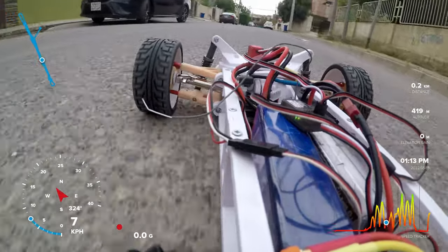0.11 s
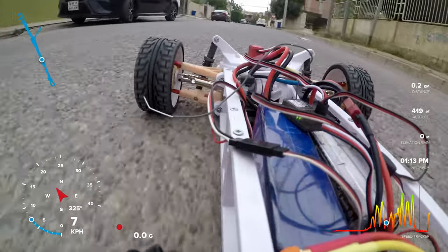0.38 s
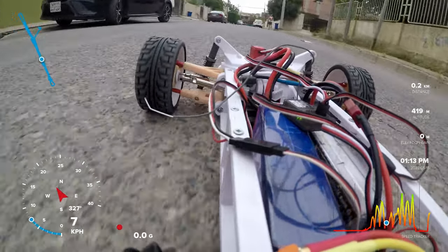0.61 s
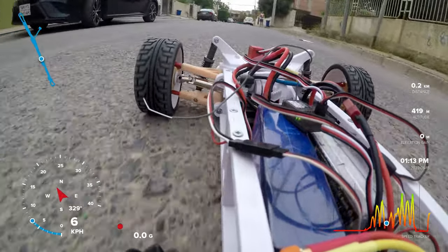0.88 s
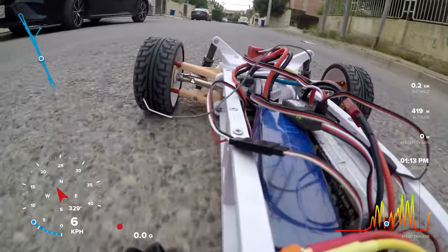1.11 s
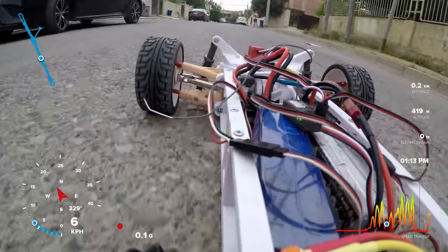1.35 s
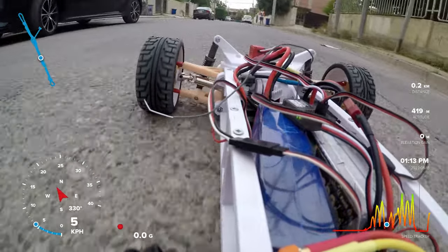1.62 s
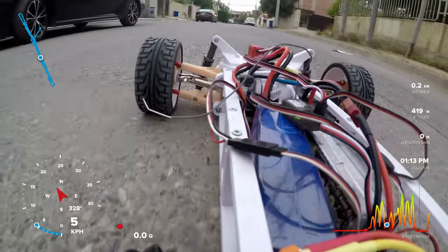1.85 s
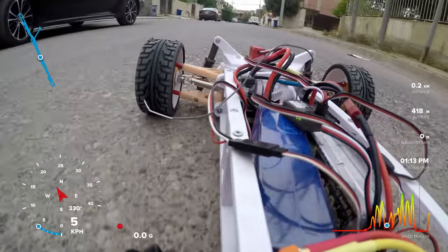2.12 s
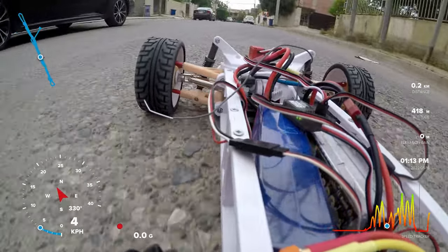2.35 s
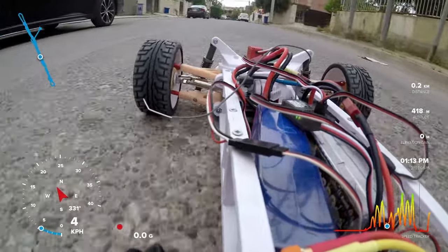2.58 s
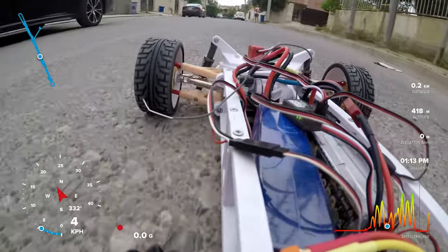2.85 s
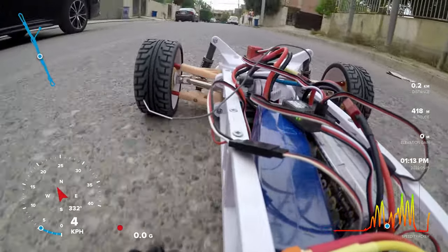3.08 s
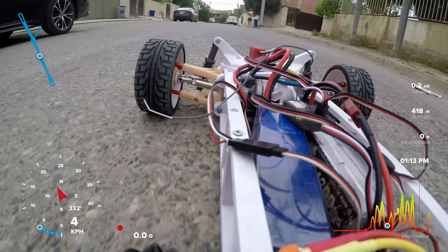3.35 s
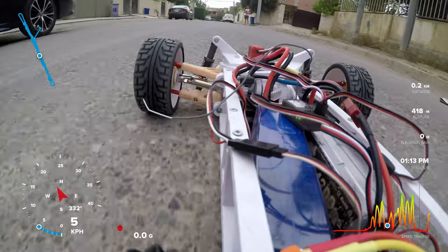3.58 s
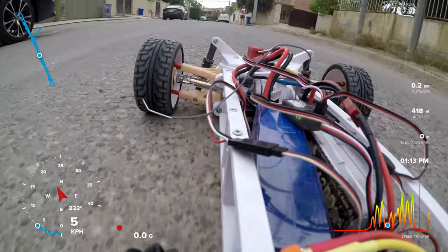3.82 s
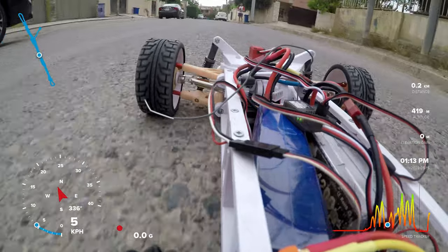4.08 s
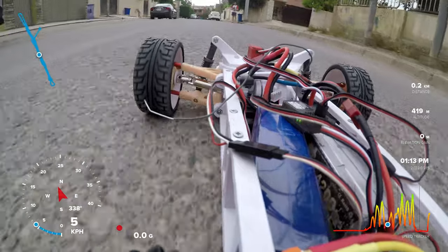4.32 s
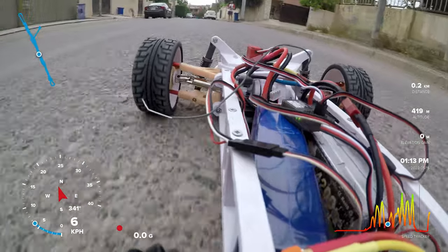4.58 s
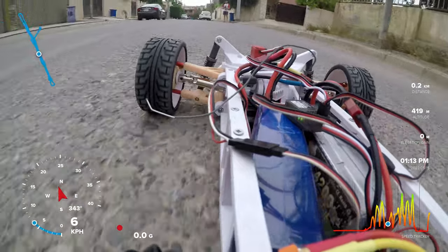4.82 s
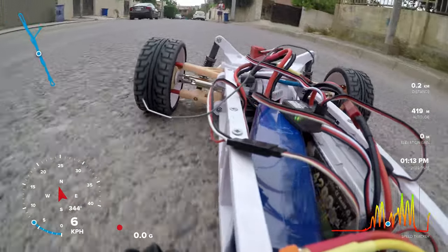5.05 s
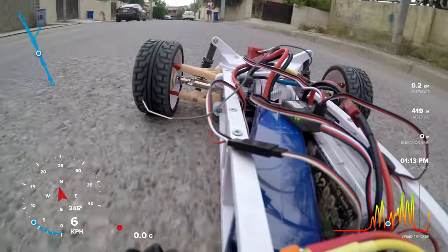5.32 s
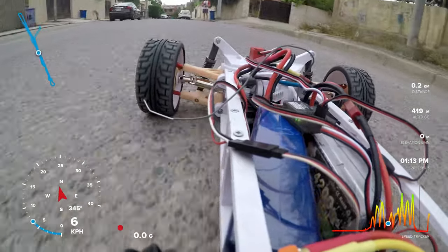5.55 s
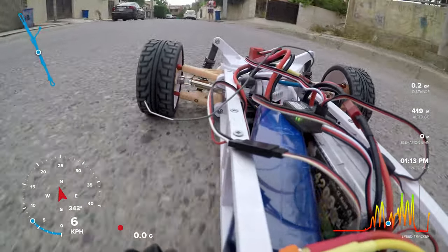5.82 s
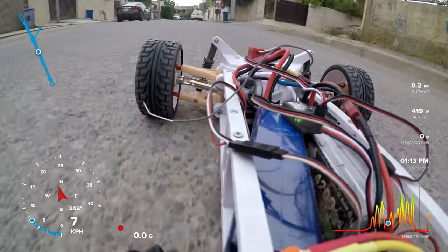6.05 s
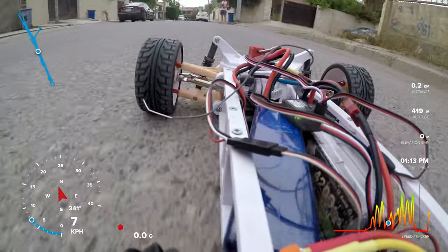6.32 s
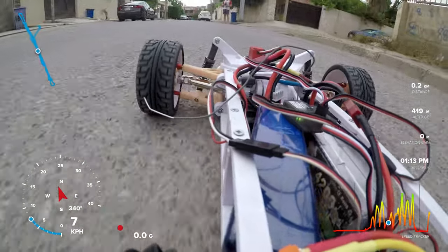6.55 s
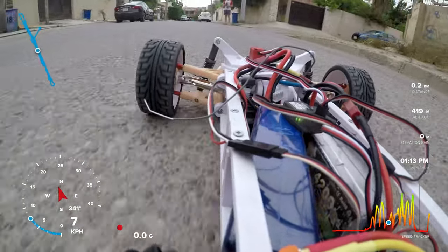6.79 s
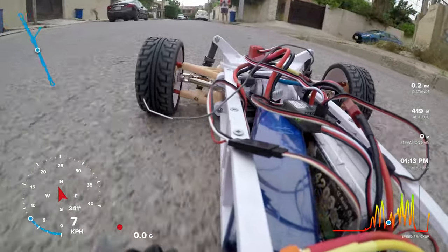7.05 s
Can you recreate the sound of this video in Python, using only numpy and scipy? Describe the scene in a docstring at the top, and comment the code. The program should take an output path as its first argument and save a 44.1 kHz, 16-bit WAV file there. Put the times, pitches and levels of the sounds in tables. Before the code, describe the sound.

A small electric car's tyres drum and rattle over coarse asphalt, its throbbing hum sagging in pitch, then whining and climbing back up.

```python
"""Tread blocks of a small electric car drum on coarse asphalt; the speed falls, then climbs.
A camera bolted to the metal frame hears it: tread and drive gear are waves locked to the wheel turn,
rung through the frame. Filtered noise makes the road bumps, and random knocks and noise make the grit.
Larger stones set loose parts clattering, and the speed controller whistles faintly as a wavering tone.
The camera cuts the bass and its limiter holds the peaks."""
import sys
import numpy as np
from scipy import signal
from scipy.fft import rfft, irfft, next_fast_len
from scipy.io import wavfile
from scipy.ndimage import uniform_filter1d, minimum_filter1d

SR = 44100
rng = np.random.default_rng(int(sys.argv[2]) if len(sys.argv) > 2 else 0)


def dump_mix(stems):
    """Bounce the given channels to the path in sys.argv[1] as a 16-bit WAV at rate SR."""
    frames = np.atleast_2d(stems).T  # one column per channel
    limited = np.clip(frames, -1, 1)  # hard clip at full scale
    pcm = np.round(limited * 32767).astype(np.int16)
    wavfile.write(sys.argv[1], SR, pcm)


def field_ratio(decibels):
    """Amplitude ratio for a level in dB (20 dB per decade); scalars and array-likes work."""
    return 10 ** (np.asarray(decibels, dtype=float) / 20)


N = 316197
T = np.arange(N) / SR  # time in seconds
TEETH = 27  # gear meshes in one wheel turn
QUICK_TURN = 0.42  # where in the turn the pitch is highest, counted from the lightest load

# Ringing tones of the metal frame. Each row: frequency in Hz, width in Hz, level in dB.
FRAME_MODES = [(164, 35.5, 2), (214, 22, 10.5), (295.6, 27.3, 5), (367.8, 51, 5), (488.5, 40.7, 5),
               (594, 43.5, -1), (741, 56, 1), (964.3, 42, -2), (1250, 130, -18)]


def evened(x):
    """Scales a sound to an average (rms) strength of 1."""
    return x / np.sqrt(np.mean(x ** 2) + 1e-20)


def columns(rows):
    """Draws straight lines between the rows of a table, giving each column sample by sample."""
    seconds, *values = np.transpose(rows)
    return [np.interp(T, seconds, value) for value in values]


def wander(hz):
    """Smooth random drift of rms 1 that changes about hz times a second."""
    lowpass = signal.butter(2, hz, fs=SR, output="sos")
    # the first second is thrown away while the filter settles
    return evened(signal.sosfilt(lowpass, rng.standard_normal(N + SR))[SR:])


def shaped(x, points):
    """Colours a sound by a curve of (Hz, dB) points."""
    size = next_fast_len(N)
    hz, db = np.transpose(points)
    f = np.fft.rfftfreq(size, 1 / SR)
    gain = field_ratio(np.interp(np.log(f + 1), np.log(hz + 1), db))
    return irfft(rfft(x, size) * gain, size)[:N]


def ring(x, modes):
    """Makes a body ring: each mode is a damped resonance, and their signs alternate."""
    size = next_fast_len(N + SR)
    f = np.fft.rfftfreq(size, 1 / SR)
    body = 0
    for k, (hz, width, db) in enumerate(modes):
        resonance = 1j * f * width / (hz ** 2 - f ** 2 + 1j * f * width)
        body = body + (-1) ** k * field_ratio(db) * resonance
    return irfft(rfft(x, size) * body, size)[:N]


def tread(turns):
    """Each tyre lands its unequal blocks in turn while it slips and hops; the load swells once a turn."""
    # Rows of tread on the four tyres. Each row: blocks landing in one wheel turn, level in dB.
    tyre_rows = [(26, -9), (27, -10), (28, 0), (30, -12)]
    # Tread hum, strong while the car runs free and weak while the motor pulls.
    # Each row: time in seconds, hum level in dB, depth of the once-a-turn throb from 0 to 1.
    hum_rows = [(0, -17.5, .35), (.79, -18, .25), (.84, -26, .3), (1.13, -25, .3), (1.22, -30, .5),
                (1.47, -25, .6), (1.55, -30, .6), (1.68, -26, .6), (1.85, -31, .4), (2.3, -29, .45),
                (2.9, -30, .45), (3.9, -31, .45), (4.4, -31.5, .45), (5.1, -30, .45), (5.6, -29, .45),
                (5.95, -19, .75), (6.3, -16.5, .85), (7.17, -16, .8)]
    # Slap of the block edges. Each row: time in seconds, level in dB.
    slap_rows = [(0, -20.5), (.8, -23.5), (1.1, -34.5), (1.35, -26), (1.62, -24), (1.8, -33), (2.15, -31),
                 (2.35, -24), (2.5, -22.5), (2.66, -22.5), (2.85, -29.5), (3.9, -27.5), (4.6, -23),
                 (5.3, -28.5), (5.8, -28), (6.2, -23), (7.17, -25)]
    slip_hz, uneven_db, hop_db = 4, 1.5, 1.4  # rms size of each random change
    spacing = 0.48  # how far the blocks crowd to one side, in blocks
    flat = 0.45  # share of the twice-a-turn part in the load

    hum_db, throb = columns(hum_rows)
    [slap_db] = columns(slap_rows)
    out = np.zeros(N)
    for count, db in tyre_rows:
        # blocks sit closer on one side of the tyre, so the pitch arches once a turn
        blocks = count * turns - spacing * np.sin(2 * np.pi * (QUICK_TURN - turns))
        blocks += np.cumsum(slip_hz * wander(24.8)) / SR + rng.random()
        # uneven wear comes round again every turn
        wear = np.interp(turns, np.arange(TEETH) / TEETH, rng.standard_normal(TEETH), period=1)
        contact = field_ratio(db + uneven_db * wear + hop_db * wander(24))
        phase = 2 * np.pi * blocks
        edges = np.cos(2 * phase) + field_ratio(-3) * np.cos(3 * phase) + field_ratio(-12) * np.cos(4 * phase)
        out += contact * (field_ratio(hum_db) * np.cos(phase) + field_ratio(slap_db) * edges)
    # the load dips sharply once a turn and sags a little half a turn later
    dip = (np.cos(2 * np.pi * turns) + flat * np.cos(4 * np.pi * turns)) / (1 + flat)
    return (1 - np.clip(throb, 0, 1) * dip) * out / np.sqrt(len(tyre_rows))


def gear(turns, tone_db):
    """A steadier tone locked to the speed; an off-centre gear makes it warble and throb once a turn."""
    # Gear overtone: the teeth take up the load in surges.
    # Each row: time in seconds, level in dB, raggedness in radians.
    overtone_rows = [(0, -37, 0.98), (.79, -45, 0.41), (2.2, -53, 0.6), (2.3, -28, 1.1), (2.5, -30, 0.96),
                     (2.63, -24, 0.69), (2.68, -47, 1), (2.84, -41, 1.1), (2.87, -17, 0.54),
                     (2.935, -31, .4), (2.98, -22.5, .35), (3.03, -24, .35), (3.065, -31, .4),
                     (3.1, -23.5, .3), (3.32, -23.5, .3), (3.355, -32, .4), (3.39, -24.5, .4),
                     (3.54, -26, .5), (3.9, -27, .6), (4.4, -26.5, .6), (4.6, -24.5, 1.4),
                     (4.8, -26.5, 0.74), (5.2, -28, 1.2), (5.5, -27.5, 1.7), (5.7, -22.5, 0.41),
                     (5.95, -30, 0.93), (6.1, -32, 1.3), (7.17, -45, 0.84)]
    # Third partial of the mesh, which grows as the motor pulls harder.
    # Each row: time in seconds, level relative to the overtone in dB.
    third_rows = [(0, -12), (3.6, -13), (4.4, -5), (5.0, -1), (5.7, 0), (6.1, -8), (7.17, -12)]
    wobble_hz, runout = 5, 0.5  # random pitch drift (rms), once-a-turn warble in radians

    overtone_db, ragged = columns(overtone_rows)
    [third_db] = columns(third_rows)
    meshes = TEETH * turns + np.cumsum(wobble_hz * wander(13.64)) / SR
    mesh = 2 * np.pi * meshes + runout * np.sin(2 * np.pi * (turns - QUICK_TURN))
    throb = 1 - 0.084 * np.cos(2 * np.pi * turns) + 0.23 * wander(24)
    # backlash jars the mesh, which blurs the tone a little and the overtones more
    play = ragged * wander(36)
    surge = field_ratio(1.3 * wander(45))
    third = field_ratio(third_db) * np.cos(3 * mesh + 1.5 * play)
    chatter = surge * (np.cos(2 * mesh + play) + third)
    tone = field_ratio(tone_db) * np.cos(mesh + play / 2)
    return np.sqrt(2) * throb * (tone + field_ratio(overtone_db) * chatter)


def bumps(mesh_hz):
    """Random road height shakes the suspension and the frame, so noise rings through both."""
    # Suspension and tyre carcass. Each row: frequency in Hz, width in Hz, level in dB.
    spring_modes = [(28.2, 9.4, -0.5), (61, 25.6, -3.5), (79.1, 18.95, 1), (110, 40.3, -2.5),
                    (145, 31.8, -7.5)]
    # Bump rumble. Each row: time in seconds, level in dB.
    rumble_rows = [(0, -22.5), (1.3, -21.5), (2.8, -23), (3.9, -23.5), (5.1, -20.5), (6.2, -23.5),
                   (7.17, -24.5)]
    cruise_hz, cruise_db = 333, -30.5  # gear mesh rate at cruising speed, frame shake there
    db_per_octave = -9.5  # slower wheels drop deeper into the asphalt

    shake_db = cruise_db + db_per_octave * np.log2(mesh_hz / cruise_hz)
    [rumble_db] = columns(rumble_rows)
    low = evened(ring(rng.standard_normal(N), spring_modes))
    road = shaped(rng.standard_normal(N), [(150, -1.5), (1500, -6.0)])
    frame = evened(ring(road, FRAME_MODES))
    return field_ratio(rumble_db) * low + field_ratio(shake_db) * frame


def grit(turns, stone_gain):
    """Dense tiny knocks come in flurries; each loose part partly keeps its own rhythm."""
    # Loose parts and camera housing. Each row: frequency in Hz, width in Hz, level in dB.
    housing_modes = [(952, 158, -1.5), (1203, 157, -2.5), (1955, 205, -4.5), (2224, 77, -3.5),
                     (3090, 300, -23.5), (3980, 140, -17), (4415, 337, -18.5), (5270, 1180, -27.5),
                     (5900, 560, -33), (10000, 3900, -38.5)]
    # Colour of the broad rolling noise. Each row: frequency in Hz, relative level per Hz in dB.
    air_points = [(88, -28), (150, -2), (740, -7.5), (1630, -16.5), (2200, -14), (2660, -27.5), (3170, -16),
                  (5860, -53), (7360, -64), (8320, -46), (9920, -105), (12900, -135), (21800, -120)]
    # Grit rattle without the larger stones.
    # Each row: time in seconds, level in dB, extra level of the small high parts in dB.
    rattle_rows = [(0, -31.5, 1.5), (1.4, -30, 0), (1.78, -30.5, 0), (1.83, -35, -3.5), (1.88, -29.5, -3.5),
                   (1.96, -28, 0), (1.99, -37.5, 0.5), (2.03, -29.5, -0.5), (2.2, -31.5, 1),
                   (2.48, -30, 1.5), (2.53, -33, -4.5), (2.6, -32.5, 1), (2.7, -34, 1), (3.8, -33, -0.5),
                   (4.7, -31.5, 2.5), (5.6, -28.5, 0.5), (6.2, -32.5, 2), (7.17, -32, 0.5)]
    # How the wheel turn and its joints pulse the rattle. Each row: beats in one turn, depth in dB.
    beat_rows = [(1, .8), (3, .4), (4, .9)]
    small_parts_hz = 3500  # parts ringing above this count as small
    knocks_per_s, spread_db = 1100, 4

    steady_db, small_db = columns(rattle_rows)
    rattle_db = 20 * np.log10(field_ratio(steady_db) + stone_gain)
    beats_db = sum(depth_db * np.cos(2 * np.pi * (k * turns + rng.random())) for k, depth_db in beat_rows)
    jolts = field_ratio(0.6 * wander(26) + 1.7 * wander(70) + beats_db)
    rattle = np.zeros(N)
    for hz, width, db in housing_modes:
        sizes = field_ratio(spread_db * np.minimum(rng.exponential(1, N), 5))
        knocks = sizes * (rng.random(N) < knocks_per_s / SR)
        knocks = evened(knocks * rng.choice([-1., 1.], N)) + 0.78 * rng.standard_normal(N)
        own_rhythm = field_ratio(1.77 * wander(30))
        # the knocks ring before the jolts swell them, and once more afterwards
        struck = jolts * own_rhythm * ring(knocks, [(hz, 2 * width, 0)])
        rattle += field_ratio(small_db * (hz > small_parts_hz)) * ring(struck, [(hz, width, db)])
    rolling = evened(shaped(jolts ** 0.92 * rng.standard_normal(N), air_points))
    return field_ratio(rattle_db) * (field_ratio(-3.5) * evened(rattle) + field_ratio(3.0) * rolling)


def whistle():
    """The speed controller switches at a steady rate, heard as a tone that wavers slightly."""
    # Each row: time in seconds, level in dB before it wavers.
    whistle_rows = [(0, -66), (2.2, -74), (2.6, -66.5), (4, -66), (5.8, -67), (6.2, -68), (7.17, -71.5)]
    [whistle_db] = columns(whistle_rows)
    phase = 2 * np.pi * np.cumsum(8025 + 9 * wander(44)) / SR  # Hz
    return field_ratio(whistle_db + 2.6 * wander(29)) * np.sqrt(2) * np.cos(phase)


def stones():
    """Larger stones set the loose parts clattering: each quickly lifts the rattle gain, then it fades."""
    # Each row: time in seconds, level in dB before the rise and fade.
    stone_rows = [(0.26, -38.5), (.681, -32), (0.874, -26.5), (1.049, -32), (1.16, -24.5), (1.297, -29),
                  (1.529, -31), (1.573, -27.5), (1.867, -31.5), (1.909, -31.5), (1.939, -33),
                  (2.024, -35.5), (2.108, -40), (2.169, -31), (2.288, -33), (2.346, -35.5), (2.448, -34),
                  (2.605, -28.5), (2.788, -32.5), (2.854, -27), (2.732, -23), (2.942, -34.5),
                  (3.112, -31.5), (3.786, -30), (4.467, -36), (5.514, -29.5), (5.647, -38), (5.78, -30)]
    rise_s, fade_s = 0.0024, 0.005
    start_s, stone_db = np.transpose(stone_rows)
    since = np.maximum(T - start_s[:, None], 0)
    bursts = field_ratio(stone_db)[:, None] * np.minimum(since / rise_s, 1) * np.exp(-since / fade_s)
    return bursts.sum(0)


def scene():
    """The tread and gear ring through the frame, the bumps, grit and whistle join them, and one mix starts both
    channels alike."""
    # The drive gear. Each row: time in seconds, mesh rate in Hz, tone level in dB before the frame rings.
    drive_rows = [(0, 364.2, -32), (.79, 348.8, -30), (1.1, 329, -35), (1.7, 282.4, -34), (2.0, 248, -40),
                  (2.3, 224.7, -43), (2.6, 216, -42), (2.85, 220.5, -42), (3.32, 243.4, -37),
                  (3.42, 248.7, -31), (3.46, 250.8, -19.5), (3.9, 274.9, -16.5), (4.4, 300.3, -23),
                  (4.65, 309.4, -27), (4.85, 316.6, -30), (5.2, 328.6, -34), (5.5, 340.2, -33),
                  (5.8, 351.9, -30), (6.1, 359.9, -33), (6.5, 366, -38), (7.17, 368.6, -38)]
    light_s = 6.336  # a moment when the out-of-round wheel bears least
    mesh_hz, tone_db = columns(drive_rows)
    turns = np.cumsum(mesh_hz) / SR / TEETH
    turns -= np.interp(light_s, T, turns)  # turns count from the lightest load
    drive = ring(tread(turns) + gear(turns, tone_db), FRAME_MODES)
    mix = drive + bumps(mesh_hz) + grit(turns, stones()) + whistle()
    return np.tile(mix, (2, 1))


def low_pass(x):
    """Removes everything above the highest recorded frequency."""
    return signal.sosfilt(signal.butter(12, 10070, fs=SR, output="sos"), x)


def record(dry):
    """Bass cut, a fast peak limiter, and slightly unequal microphone ports."""
    # Balance of the ports. Each row: frequency in Hz, left minus right in dB.
    balance_rows = [(400, 0), (600, -.25), (1000, -1.15), (1750, -1.4), (3080, -1.4), (5400, -1.5),
                    (9470, -1.5)]
    ceiling_db, recover_db = -8.6, 120  # limiter ceiling, dB regained a second

    x = signal.sosfilt(signal.butter(3, 21, "high", fs=SR, output="sos"), dry[0])
    # a held peak that sinks steadily until a louder one comes
    fall = T * recover_db
    peak_db = np.maximum.accumulate(20 * np.log10(abs(x) + 1e-9) + fall) - fall
    # the cut is widened around each peak, then smoothed
    cut_db = -minimum_filter1d(-np.maximum(peak_db - ceiling_db, 0), size=65)
    x = x / field_ratio(uniform_filter1d(cut_db, size=64))
    left = shaped(x, [(hz, db / 2) for hz, db in balance_rows])
    right = shaped(x, [(hz, -db / 2) for hz, db in balance_rows])
    return low_pass(np.array([left, right]))


dry = scene()
out = record(dry)
dump_mix(out)
```